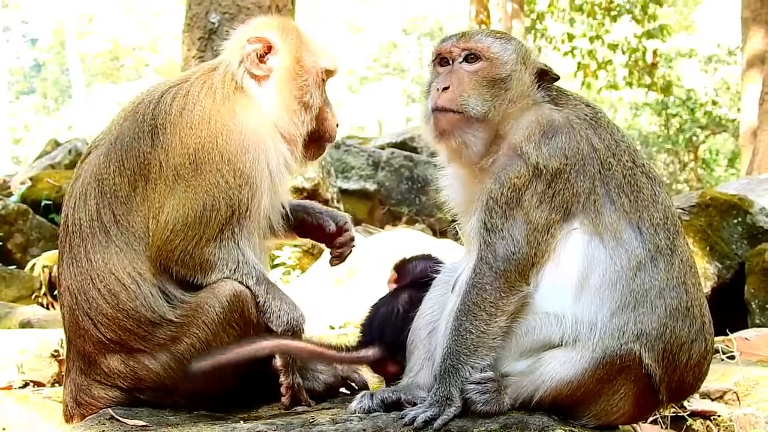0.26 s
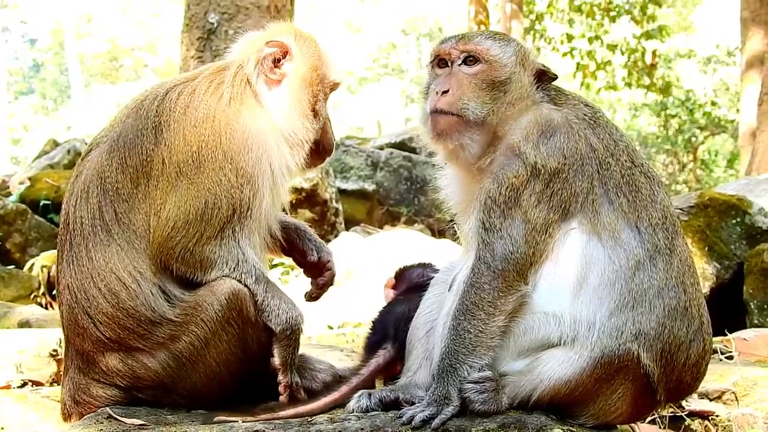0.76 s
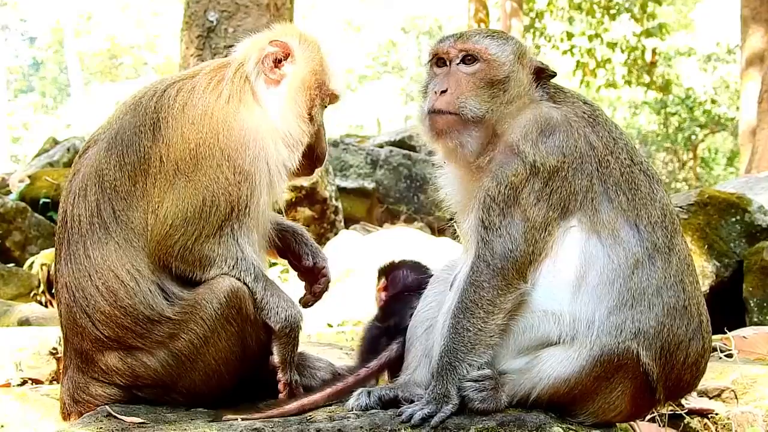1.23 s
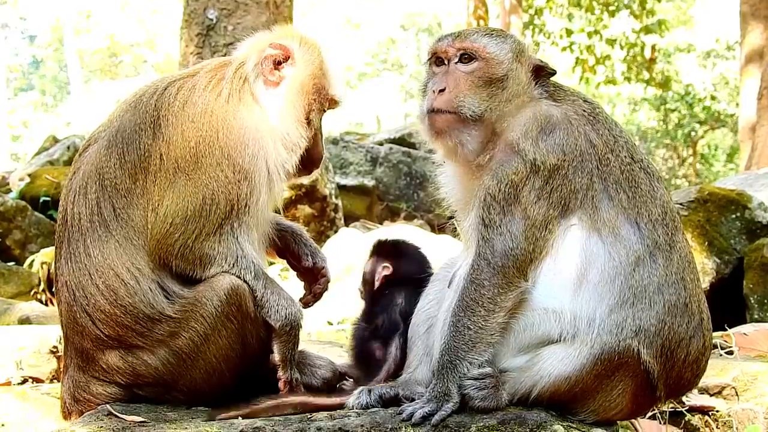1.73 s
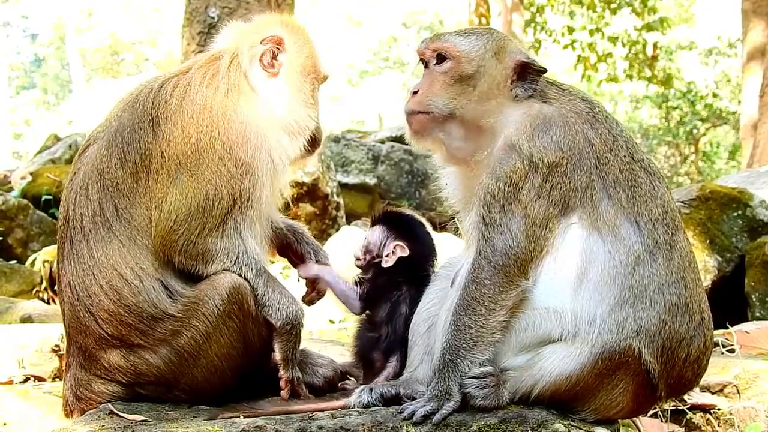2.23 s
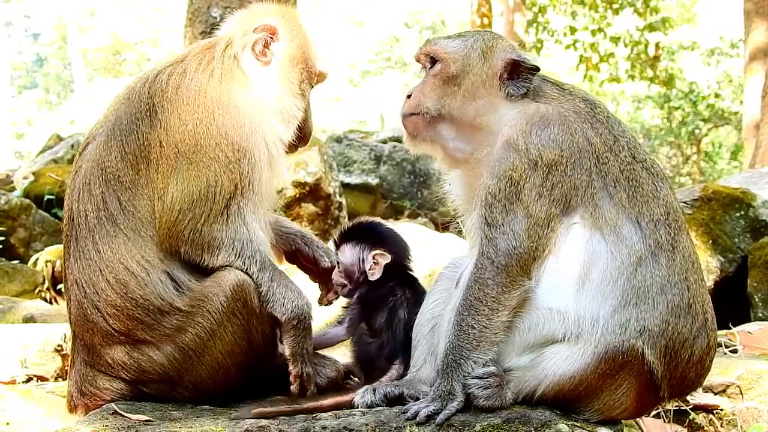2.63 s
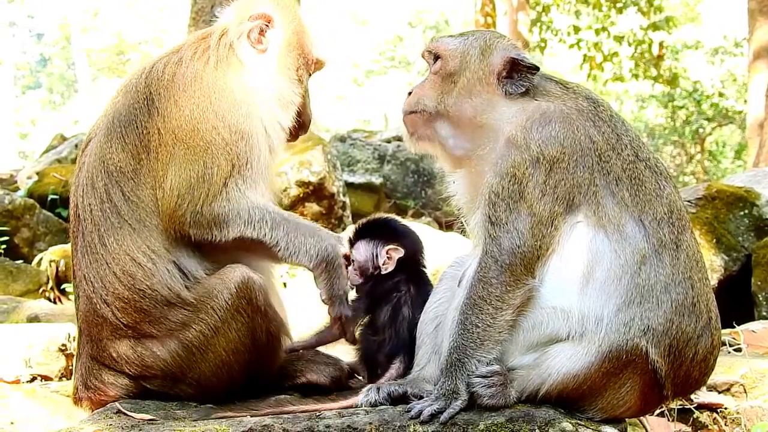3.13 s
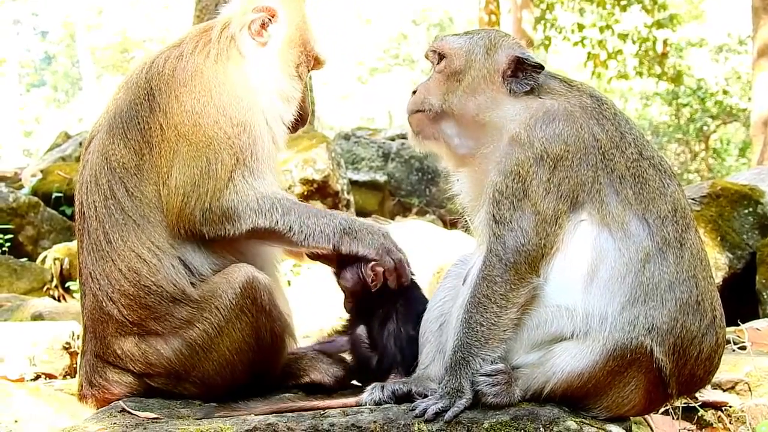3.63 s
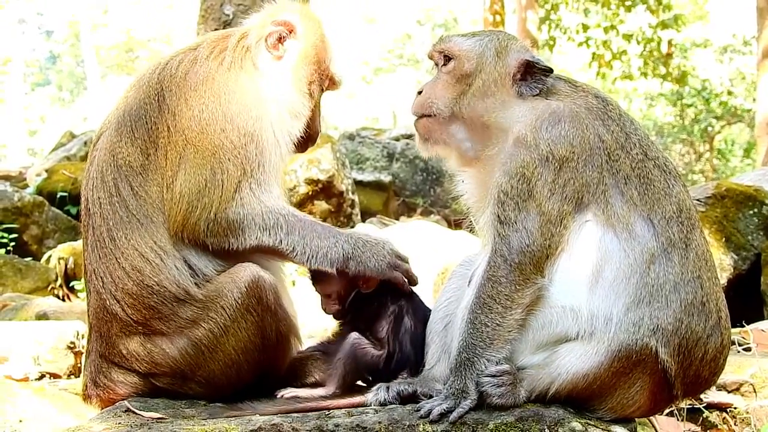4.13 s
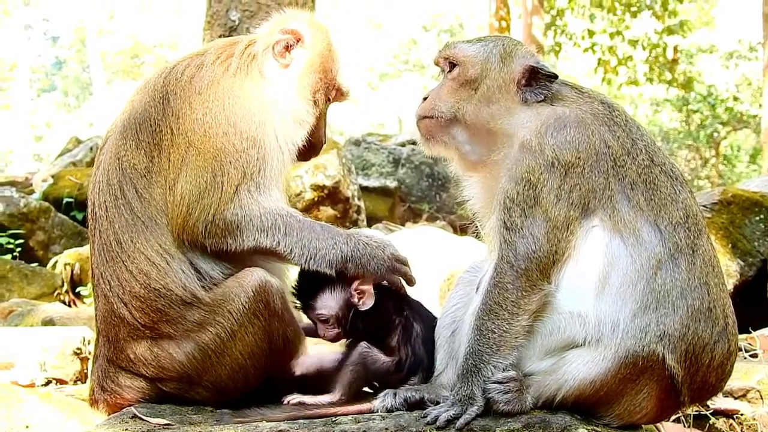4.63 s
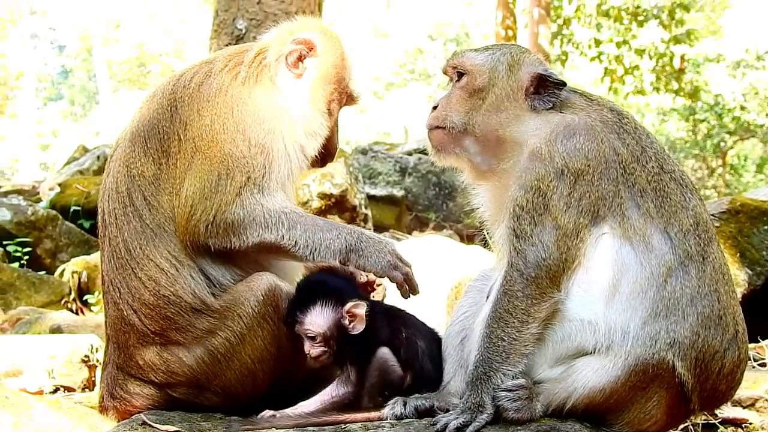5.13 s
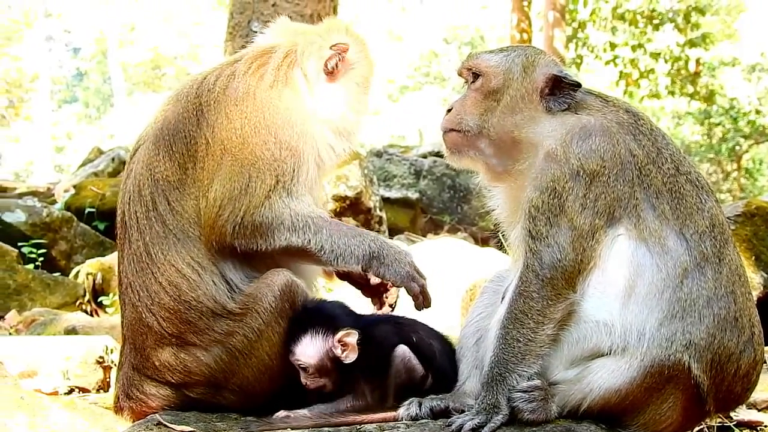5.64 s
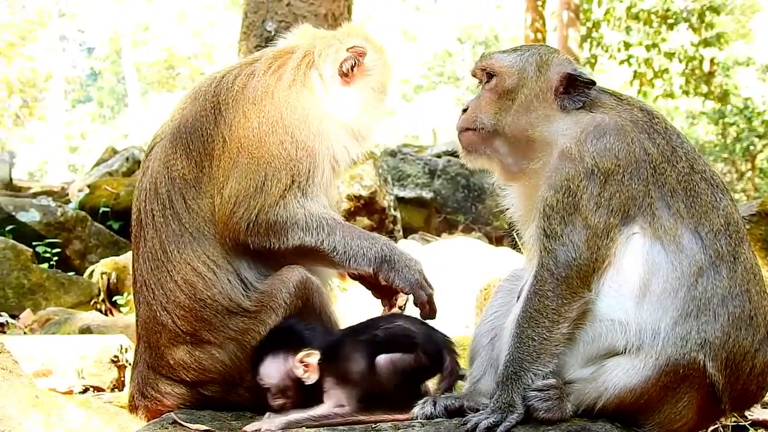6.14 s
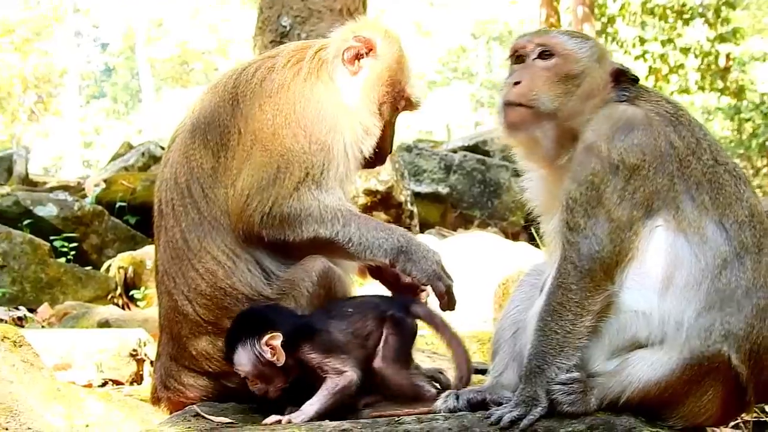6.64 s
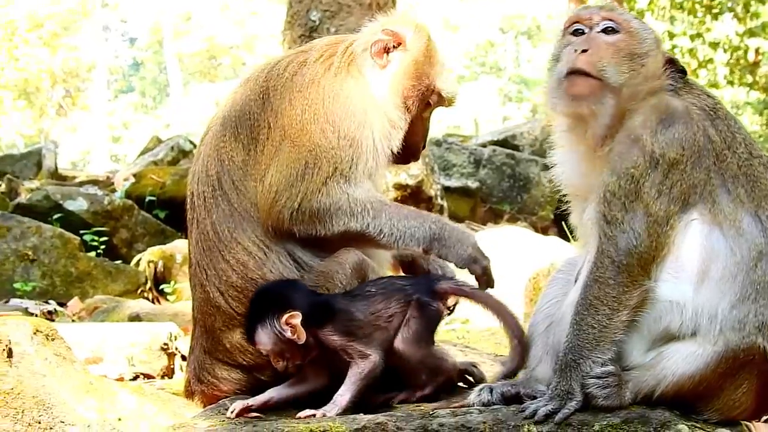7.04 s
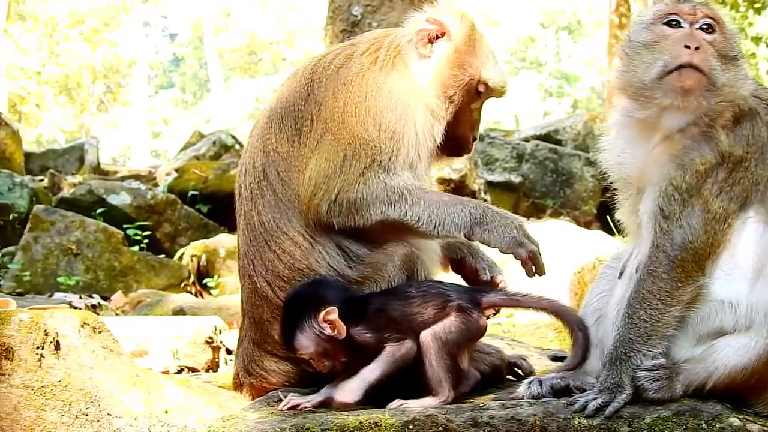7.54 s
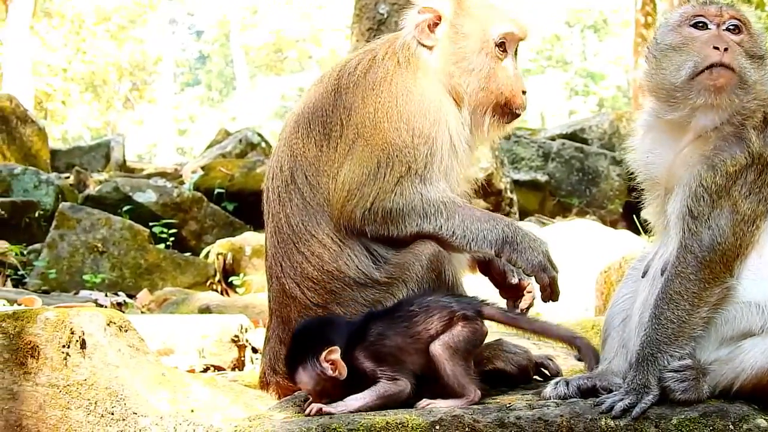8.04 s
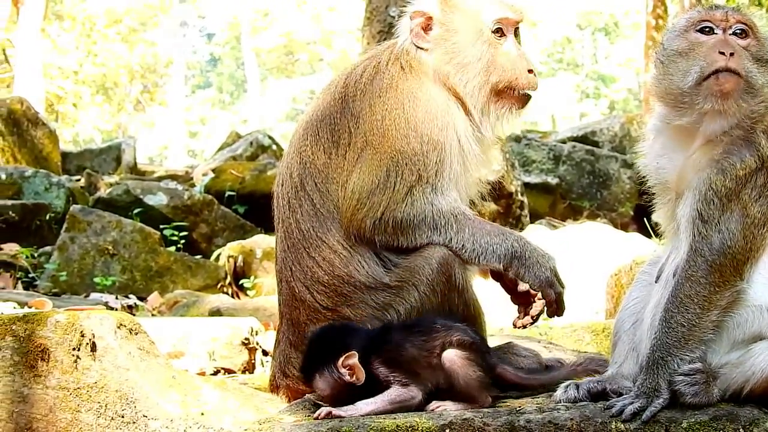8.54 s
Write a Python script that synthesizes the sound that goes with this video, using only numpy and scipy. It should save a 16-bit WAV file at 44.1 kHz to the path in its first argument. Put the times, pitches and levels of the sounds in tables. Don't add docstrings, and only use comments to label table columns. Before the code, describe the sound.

Outdoors among rocks and trees, a fading hoarse monkey cry and two hollow wood knocks open the scene. A bird whistles, then a young monkey squeals loudly close by. Distant cries and rough hoots arrive as echo, and a softer squeal follows. Near six seconds paws scramble in dry leaves, snapping twigs, with another squeal. An adult grunts, a loud far cry sounds, and a last squeal sags. Soft hiss and a far motor hum lie beneath.

```python
import sys
import numpy as np
from scipy import signal
from scipy.fft import rfft, irfft, next_fast_len
from scipy.io import wavfile
from scipy.ndimage import uniform_filter1d

SR = 44100
rng = np.random.default_rng(int(sys.argv[2]) if len(sys.argv) > 2 else 0)


def boost_factor(decibels):
    exponent = np.asarray(decibels, float) / 20
    return 10 ** exponent


def put_to_file(sound):
    columns = np.atleast_2d(sound).T
    safe = np.clip(columns, -1, 1)
    whole_steps = np.round(safe * 32767)
    wavfile.write(sys.argv[1], SR, whole_steps.astype(np.int16))


N = 386842
TIME = np.arange(N) / SR
STEP = 64

# (f/Hz, density/dB)
FOREST = [(15, -43), (25, 1), (123, -2.5), (178, -5), (229, -7), (332, -11.5), (560, -17), (833, -8.5),
          (1710, -14.5), (2040, -14.5), (3440, -15), (3990, -16.5), (6240, -14), (7070, -50), (9530, -59),
          (12400, -78.5), (21000, -120)]
# (f/Hz, likeness)
LIKENESS = [(60, 1.0), (160, 0.96), (450, 0.88), (1220, 1), (3330, 0.32), (9080, 0.12)]
# (f/Hz, width/Hz, level/dB)
MOTOR = [(61.2, 26, -10.5), (113.4, 29.6, -2.5), (167.9, 11.9, -6.5), (224.8, 4.4, -19)]
# (t/s, level/dB)
MOTOR_LEVEL = [(0.0, -45.5), (0.32, -45.5), (0.85, -53), (1.98, -56), (3.81, -55.5), (4.05, -53.5),
               (5.59, -55), (6.01, -49.5), (6.28, -53.5), (6.64, -52), (7.13, -55.5), (7.52, -52),
               (7.84, -56), (8.77, -55)]
# (f/Hz, decay/s, level/dB)
ECHO = [(504, 0.43, 5), (2510, 0.51, 8.5), (3334, 0.83, -1), (3810, 0.51, 10.5), (5580, 0.52, 7),
        (6500, 0.35, 9), (12700, 0.18, 8.5)]
ECHO_T60, ECHO_COLOUR = np.array(ECHO)[:, :2], np.array(ECHO)[:, ::2]
# (t/s, f/Hz, level/dB)
WHISTLE = [
    (0.822, 6520, -54),
    (0.87, 5950, -44),
    (.905, 5190, -56),
    (0.937, 4620, -64.5),
    (.99, 5390, -49),
    (1.015, 6050, -44.5),
    (1.055, 7070, -51),
]

# (t/s, f/Hz, level/dB, roughness 0-1)
HOOTS = [
    [(2.91, 2560, -48, 0.8), (2.96, 2127, -53, 0.97), (3.02, 1420, -46, 0.8), (3.06, 1076, -51, .9),
     (3.12, 1003, -55, 0.95), (3.27, 1125, -56.5, 0.56), (3.4, 1246, -47, 0.6), (3.5, 1316, -51, 0.45),
     (3.54, 1300, -67, .5)],
    [(3.33, 587.4, -59, 0.5), (3.4, 606, -48, 0.54), (3.47, 614, -48, 0), (3.53, 617, -46, 0.3)],
    [(3.52, 622, -45, .3), (3.6, 612, -44, 0.74), (3.64, 574, -44.5, 1.2), (3.69, 601, -46, 1),
     (3.75, 560, -44, 1.1)],
    [(1.0, 565, -59, 0.6), (1.08, 577.5, -51, .4), (1.22, 587, -59, .4), (1.33, 575, -55, 0.7)],
    [(2.64, 558, -44, 0.45), (2.7, 579, -55, .4), (2.78, 567, -61, .6)],
]
HOOT_TILT_DB = [-18.5, 2, 7.5, -3, 4]
# (f/Hz, level/dB)
HOOT_THROAT = [(500, -40), (1250, 5), (1900, -1), (2500, 3.5), (3100, -7), (3750, -19), (4350, -7),
               (5500, -12), (6300, -12.5), (9000, -68)]
# (t/s, length/s, top f/Hz, level/dB, tilt/dB per octave)
ANSWERS = [
    (5.164, 0.22, 847, -65, -6),
]
# (share of length, share of top pitch, level/dB, roughness 0-1)
ARCH = [(0, 0.95, -9.5, 0.7), (0.161, 0.99, 5, 0.38), (0.329, 0.95, 0.5, 0.48), (.62, 1, -2.5, 0.05),
        (.84, 0.93, -3.5, 0.47), (1.001, 0.61, -0.5, 0.9)]
# (t/s, f/Hz, level/dB, roughness 0-1)
CRIES = [
    [(-.02, 931.5, -24.5, 1.2), (.04, 897, -36, 0.84), (.1, 866, -39.5, 0.77), (.17, 915, -49.5, 1.17),
     (.26, 864, -62, .95)],
    [(1.04, 768, -61, 0.5), (1.1, 823, -49.5, 0.42), (1.18, 840, -49.5, 0.39), (1.26, 872, -45.5, 0.9),
     (1.34, 890, -54, 0.7), (1.46, 900, -63, 0.9)],
    [(2.485, 785, -47, .3), (2.53, 881, -33.5, 0.31), (2.56, 916.6, -36.5, .4), (2.65, 920, -38, 0.5),
     (2.695, 887, -38, 0.32), (2.725, 799, -35.5, 0.4), (2.74, 766, -43, 0.6)],
    [(4.56, 840, -57.5, 0.2), (4.62, 896, -47.5, 0.59), (4.66, 957, -48, 0.7), (4.72, 945, -44, 0.63),
     (4.82, 945, -44.5, 0.8), (4.9, 944, -53, .75), (5.0, 922, -52.5, 0.44)],
    [(8.145, 816, -38, 0.75), (8.18, 858, -30.5, 0.54), (8.205, 901, -29, 0.6), (8.228, 941, -21.5, 0.2),
     (8.27, 951, -22.5, 0.4), (8.35, 921, -25.5, 0.2), (8.39, 890, -25, 0.78), (8.42, 872, -29, 1.1)],
]
# (f/Hz, level/dB)
FAR_THROAT = [(470, -65.5), (800, -43), (1810, -21), (2430, -10.5), (2750, -11.5), (3240, -2.5), (3790, 3),
              (4330, -31.5), (5560, -11.5), (6700, -8), (9530, -55), (12400, -81), (21000, -120)]
ROUGH_PER_DB, DROOP_PER_DB = 0.022, 0.13

# (peak t/s, level/dB, rise/s, fall/s, dull over bright/dB); flanks span 20 dB
RUSTLE = [(0.0, -39, .1, 0.19, -9), (.39, -59, 0.53, 0.16, 18.5), (.534, -50, 0.2, 0.32, 1.5),
          (1.004, -60, 0.97, 0.55, 3), (1.45, -62.5, 0.74, 0.79, 6.5), (1.7, -61, 0.41, 0.37, -21),
          (2.664, -51.5, 0.99, 0.61, 0), (3.03, -60.5, 0.22, 0.42, 2), (3.182, -47, 0.21, 0.091, -5),
          (3.66, -63.5, 0.72, 0.66, -20), (4.804, -59.5, 1, 0.28, -26), (5.04, -60, 0.24, 0.09, -25),
          (5.2, -78.5, 0.21, .4, 20), (5.66, -41.5, 0.025, 0.5, -7), (5.782, -39.5, 0.0085, 0.31, -34),
          (5.847, -44, .015, .1, 0), (5.887, -37, .012, .3, -8), (5.96, -42, 0.12, .15, -30),
          (6.008, -37, .03, 0.25, -7), (6.09, -29.5, 0.12, 0.17, -4), (6.155, -44, 0.018, 0.13, -9),
          (6.25, -29, 0.36, 0.34, -9.5), (6.4, -42, .3, 0.14, 3), (6.52, -28, 0.25, 0.073, -15),
          (6.585, -36.5, 0.14, 0.027, -6), (7.093, -62, 1, 0.93, 7), (7.25, -48, 0.1, 0.24, -1.5),
          (7.48, -65, 1, 0.066, 17.5), (7.6, -41.5, 0.042, 0.12, -6), (7.8, -55.5, 0.091, 0.22, 5.5),
          (7.935, -46.5, .06, 0.21, -10), (8.06, -39, .012, .4, -23), (8.14, -42, 0.71, 0.98, -15.5),
          (8.49, -31, 0.33, 0.42, -17), (8.71, -33.5, 0.24, 0.24, -7.5)]
# (f/Hz, density/dB)
LEAVES = [(180, -29), (300, -21), (500, -13.5), (1680, -4.5), (2340, -6), (3300, -5), (4200, -8),
          (5100, -6.5), (6400, 2), (7600, -20.5), (9000, -51.5), (11000, -37), (14500, -53), (16000, -70)]
# (f/Hz, left-right likeness)
LEAF_LIKENESS = [(200, 1), (500, 0.98), (1000, 0.82), (2000, 0.43), (5000, 0.19), (9000, -1.41)]
STILL_DB, STILL_DULL_DB = -68.5, 4.5
MIDDLE_DB, MIDDLE_FOLLOWS = -9.5, 0.24

# (t/s, peak level/dB, ring f/Hz, low level/dB, top level/dB)
SNAPS = [(1.6885, -39.5, 6330, -66, -48), (3.1788, -33.5, 6300, -58, -55), (3.2058, -38, 6400, -52, -54),
         (3.269, -38, 6820, -54.5, -52), (3.339, -43.5, 6950, -56, -69), (3.654, -30, 4730, -69, -59),
         (3.7083, -40, 6800, -60, -39), (5.657, -42, 6480, -54, -58), (5.779, -35, 6300, -53, -64),
         (5.815, -28.5, 6340, -56, -66), (5.847, -42, 5460, -50, -55), (5.866, -33, 6600, -59, -60),
         (5.886, -29.5, 6400, -42.5, -52), (5.96, -41, 6960, -58, -58), (6.007, -30, 6140, -46, -49),
         (6.042, -43, 6420, -54, -55), (6.0517, -23, 5620, -44, -45), (6.0893, -19, 5600, -54, -29),
         (6.1232, -33, 6390, -49, -48), (6.1517, -17, 4830, -39, -38.5), (6.1796, -22, 3100, -41, -46),
         (6.2095, -27, 5400, -48, -48), (6.2589, -20.5, 4300, -41, -50), (6.3605, -26, 5100, -39, -47),
         (6.4701, -20, 3350, -34, -46), (6.5278, -25.5, 7000, -40.5, -46), (6.5758, -31, 6600, -53, -48),
         (6.739, -45, 3580, -46.5, -53), (6.788, -49, 3500, -69, -55), (7.2491, -24, 5960, -54, -39),
         (7.597, -39, 6300, -48, -58), (7.7997, -37, 4230, -62, -57), (7.9312, -28.5, 5740, -58, -50.5),
         (8.0576, -23, 6200, -73, -53), (8.465, -25, 4400, -46.5, -53), (8.676, -28, 4000, -36.5, -49)]
# (t/s, peak level/dB, ring f/Hz)
TICKS = [(5.697, -32.5, 6000), (5.986, -29, 6100), (6.031, -38.5, 6250), (6.189, -31.5, 6200),
         (6.235, -27.5, 6000), (6.549, -35.5, 1500), (6.595, -43, 7850), (6.839, -56, 4300),
         (7.1035, -56.5, 6500), (7.121, -47, 5800), (7.172, -55, 6360), (7.19, -48, 6400),
         (7.2256, -40, 6240), (7.777, -55, 7900), (7.829, -40, 4340), (7.937, -34, 6300),
         (8.081, -46, 6500), (8.1424, -51.5, 6400)]
# (t/s, low level/dB)
PATS = [(0.3038, -41), (.371, -52), (0.4094, -40), (0.7865, -53.5), (1.001, -56.5), (1.0126, -52.5),
        (1.099, -50), (1.2194, -51.5), (1.401, -55), (1.499, -59), (2.439, -56), (2.569, -42),
        (3.0265, -56), (3.119, -46.5), (2.163, -48), (7.12, -68), (7.1906, -52)]
# (t/s, peak level/dB, ring f/Hz)
KNOCKS = [
    (0.304, -20, 488),
    (0.412, -23, 460),
    (2.439, -39, 476),
    (6.051, -28, 483),
    (6.405, -28.5, 560),
]

# (t/s, f/Hz, level/dB)
COO = [
    (5.99, 509.2, -64),
    (6.064, 516, -39.5),
    (6.118, 460, -54),
    (6.13, 507.5, -71),
]
# (t/s, level/dB, pulse f/Hz)
GRUNT = [
    (7.44, -70, 96),
    (7.456, -43, 95),
    (7.502, -35.5, 73),
    (7.566, -36, 130),
    (7.764, -55, 120),
    (7.78, -63, 54),
]
# (f/Hz, width/Hz, level/dB)
GRUNT_MOUTH = [(1370, 410, 11), (1730, 52, 3), (2730, 370, 1.5)]

# (t/s, hold until the break/s, top f/Hz, sag/Hz per s, level/dB)
SQUEALS = [
    (1.856, 0.176, 840.2, 89.5, -16),
    (3.881, 0.172, 847.7, -10.5, -24.5),
    (6.258, .16, 846.5, 14.5, -20),
    (8.49, 0.14, 869.4, 369.5, -18.5),
]
# (rise/s, scoop/Hz, onset level/dB, end of hold level/dB)
ATTACKS = [(.075, 270, -37, -2.5), (0.046, 30, -21.5, -3.5), (0.0461, 37.5, -13, -2), (.04, 200, -15.5, -1)]
# (f/Hz, level/dB)
THROAT = [(840, -44), (1680, -22), (2520, -7), (3380, -2), (4200, -27), (5050, -6.5), (5900, -13.5),
          (6750, -15.5), (7600, -21), (8450, -19), (9300, -37.5), (10100, -53), (11800, -44),
          (12800, -53.5), (15600, -68.5)]
BREAK_S, DROP_HZ_PER_S2, SWELL_DB, FADE_DB = 0.1075, 22000, -21.5, -23
CLEAR, HOARSE, HOLD_TILT_DB, BREAK_TILT_DB = 0.094, 1, -0.5, 6.5

MOUTH_HZ = [1200, 1800, 2600, 3500, 4300, 5500, 6700, 8500]
SQUEAL_MOUTHS = [(-8, -6, -7, 2.7, -7.5, -0.43, -3, -2.2), (-6, -0.2, -3.5, 2, 5.5, 0.58, 2.5, 1),
                 (-13, -1.5, -0.5, 0.37, 5, 0.87, 4.5, 0.38), (-4, 3, -5.5, 0.76, 7, 0.31, 4.5, -1.1)]
ANSWER_MOUTHS = [(.1, .1, .1, .1, 0.11, .1, .1, .1)]
CRY_MOUTHS = [(2, 1, 4.5, .1, -11, 2, -8, .1), (2, 3.5, -0.5, .1, -23, -6, -10, -9),
              (.1, 12, -0.5, .1, 2, -1, 0, 8), (5, 1, 0.5, .1, -1, 7.5, -1, -2),
              (-5, .1, -3.5, .1, 12, 5, 1, 17)]
HOOT_MOUTHS = [(-3, -1, -3, -5, 25, -5.5, -1, 4), (-9, -2, -1, -3, -4.5, -7, 5, -5),
               (-18, 7.5, -1, 14, -6, 7, -4, .1), (-1, 3, -1.5, -9.5, -12, -7, -9, -9),
               (-5, -10, -17, -17, -18, -15, -15, -17)]


def rms_one(x):
    return x / np.sqrt(np.mean(x ** 2) + 1e-20)


def in_time(rows):
    s, *columns = np.transpose(rows)
    return [np.interp(TIME, s, c) for c in columns]


def at_hz(points, hz):
    f, value = np.array(points).T
    return np.interp(np.log(hz), np.log(f), value)


def gate(rows, fade=0.009):
    return np.clip(np.minimum(TIME - rows[0][0], rows[-1][0] - TIME) / fade, 0, 1)


def drift(rate, size=N):
    r = np.exp(-2 * np.pi * rate / SR)
    settle = 9000
    white = rng.standard_normal(size + settle)
    return rms_one(signal.lfilter([1], [1, -2 * r, r * r], white)[settle:])


def resonance(x, hz, width):
    r = np.exp(-np.pi * width / SR)
    poles = [1, -2 * r * np.cos(2 * np.pi * hz / SR), r * r]
    return signal.lfilter([(1 - r * r) / 2, 0, (r * r - 1) / 2], poles, x + 1e-18)


def resonate_twice(x, hz, width):
    return resonance(resonance(x, hz, width), hz, width)


def pan(x, db):
    return x * boost_factor(np.array([[db / 2], [-db / 2]]))


def bands(white, spectrum, likeness, gain_db, patchy_db):
    out, edges = 0, 28 * 2 ** np.arange(0, 9.2, 1 / 3)
    for k, (low, high) in enumerate(zip(edges, edges[1:])):
        band = signal.butter(2, [low, high], "band", fs=SR, output="sos")
        mid, side = signal.sosfilt(band, white[k % 2])
        hz = np.sqrt(low * high)
        alike = np.clip(at_hz(likeness, hz), -1, 1)
        flicker_db = patchy_db * drift(1300, size=len(TIME[::STEP]))
        gain = np.repeat(boost_factor(at_hz(spectrum, hz) + gain_db(hz) + flicker_db), STEP)[:N]
        out = out + gain * (np.sqrt(1 + alike) * mid + np.sqrt(1 - alike) * side * [[1], [-1]])
    return out


def tone(rows, rough):
    pitch, level_db = in_time(rows)
    wave = np.sin(2 * np.pi * np.cumsum(pitch) / SR)
    return np.sqrt(2) * boost_factor(level_db) * gate(rows) * (1 + rough * drift(95)) * wave


def voice(calls, throat, mouths, jitter, wobble_db):
    out = np.zeros(N)
    for rows, mouth_db in zip(calls, mouths):
        mouth = list(zip(MOUTH_HZ, mouth_db))
        on = gate(rows) > 0
        pitch, level_db, rough, tilt_db = (c[on] for c in in_time(rows))
        size, rough = len(pitch), np.clip(rough, 0, 1)
        pitch = uniform_filter1d(pitch, size=900, mode="nearest")
        phase = 2 * np.pi * np.cumsum(pitch * (1 + jitter * rough * drift(103, size=size))) / SR
        call, power = 0, 0
        for k in range(1, 19):
            hz = k * pitch
            colour_db = at_hz(throat, hz) + at_hz(mouth, hz) + tilt_db * np.log2(hz / 3500)
            weight = boost_factor(colour_db + wobble_db * drift(24, size=size)) * (hz < throat[-1][0])
            breath = 1 + rough * drift(200, size=size) + rough ** 2 * drift(680, size=size)
            call = call + weight * breath * np.sin(k * phase + k * k)
            power = power + weight ** 2 * (1 + 3 * rough ** 2) / 2
        level = boost_factor(level_db + 0.8 * drift(24, size=size))
        out[on] += level * gate(rows)[on] * call / np.sqrt(power)
    return out


def forest_hiss():
    white = rng.standard_normal((2, 2, N))
    return boost_factor(-61) * rms_one(bands(white, FOREST, LIKENESS, lambda hz: 0, patchy_db=-0.5))


def motor():
    white = rng.standard_normal(N)
    hum = sum(boost_factor(db) * rms_one(resonate_twice(white, hz, width)) for hz, width, db in MOTOR)
    return boost_factor(in_time(MOTOR_LEVEL)[0]) * rms_one(hum)


def echoes(x):
    size = next_fast_len(N + SR)
    t, tail = np.arange(SR) / SR, 0
    white = rng.standard_normal((2, SR))
    white[1] = 0.79 * white[0] + 0.57 * white[1]
    for low in 200 * 2 ** np.arange(0, 6.3, 1 / 3):
        sos = signal.butter(2, [low, 1.26 * low], "band", fs=SR, output="sos")
        hz = 1.12 * low
        decay_db = at_hz(ECHO_COLOUR, hz) - 60 * t / at_hz(ECHO_T60, hz)
        tail = tail + signal.sosfilt(sos, white) * boost_factor(decay_db)
    tail = tail * np.clip((t - 0.006) / 0.0062, 0, 1)
    tail = tail / np.sqrt(np.sum(tail ** 2, axis=1, keepdims=True))
    return irfft(rfft(x, size) * rfft(tail, size), size)[:, :N]


def cliff(x):
    size = next_fast_len(N + SR // 2)
    dulled = signal.sosfilt(signal.butter(2, 6500, fs=SR, output="sos"), x)
    spectrum = rfft(dulled, size)
    lags = [np.clip(0.13 + 0.045 * drift(30, size=len(spectrum)), 0.04, 0.22) for side in range(2)]
    turn = np.exp(-2j * np.pi * np.cumsum(lags, axis=1) * SR / size)
    return boost_factor(-11.5) * irfft(spectrum * turn, size)[:, :N]


def bird():
    again = [(s + 3.98, hz, db - 14.5) for s, hz, db in WHISTLE]
    return tone(WHISTLE, rough=0.75) + tone(again, rough=1.5)


def hoots():
    calls = [[(*row, tilt_db) for row in rows] for rows, tilt_db in zip(HOOTS, HOOT_TILT_DB)]
    return voice(calls, HOOT_THROAT, HOOT_MOUTHS, jitter=0.021, wobble_db=2.5)


def answer(start, length, hz, level_db, tilt_db):
    droop = 1 - DROOP_PER_DB * np.clip(tilt_db, -6, 6)
    rows = []
    for share, bend, db, rough in ARCH:
        fall = (1 - bend) * (droop if share > 0.7 else 1)
        roughness = rough + ROUGH_PER_DB * tilt_db
        rows.append((start + share * length, hz * (1 - fall), level_db + db, roughness, tilt_db))
    return rows


def far_calls():
    calls = [answer(*row) for row in ANSWERS] + [[(*row, 0) for row in rows] for rows in CRIES]
    return voice(calls, FAR_THROAT, ANSWER_MOUTHS + CRY_MOUTHS, jitter=0.025, wobble_db=3.5)


def bouts():
    s, level_db, rise, fall, dull_db = np.transpose(RUSTLE)[:, :, None]
    since = TIME[::STEP] - s
    bout_db = level_db - 20 * np.where(since < 0, -since / rise, since / fall)

    def total(db, still_db):
        return 10 * np.log10(np.sum(boost_factor(db) ** 2, axis=0) + boost_factor(still_db) ** 2)

    dull = total(bout_db + dull_db, STILL_DB + STILL_DULL_DB)
    middle = total(bout_db + MIDDLE_DB + MIDDLE_FOLLOWS * dull_db, STILL_DB + MIDDLE_DB)
    return dull, middle, total(bout_db, STILL_DB)


def rustle():
    dull_db, middle_db, bright_db = bouts()
    close = np.repeat(np.clip((bright_db + 50) / 12, 0, 1), STEP)[:N]
    strength = boost_factor(4 * np.minimum(rng.exponential(1, N), 2.5))
    grains = (rng.random((2, 1, N)) < 110 / SR) * strength
    grains = signal.lfilter([1], [1, -0.98], grains)
    white = rng.standard_normal((2, 2, N)) * (1 - 0.3 * close + 0.9 * close * grains)

    def gain_db(hz):
        place = np.interp(np.log(hz), np.log([1100, 2800, 6000]), [0, 1, 2])
        dull, middle, bright = [max(0, 1 - abs(place - k)) for k in (0, 0.98, 2)]
        return dull * (dull_db + 14.5) + middle * (middle_db + 15.5) + bright * (bright_db + 9.5)

    return pan(bands(white, LEAVES, LEAF_LIKENESS, gain_db, patchy_db=2.5), 1.4)


def snaps():
    length = 1500
    out, t = np.zeros((2, N + length)), np.arange(length) / SR
    hits = SNAPS + [(s, db, hz, db - 26, db - 13) for s, db, hz in TICKS]
    hits = hits + [(s, db - 30, 2600, db, db - 55) for s, db in PATS]
    for s, peak_db, hz, low_db, top_db in hits:
        burst = rng.standard_normal((2, length))
        ring = resonate_twice(burst * np.exp(-t / 0.0035), hz, 0.35 * hz)
        dull = resonate_twice(burst[0] * np.exp(-t / 0.004), 950, 2200)
        dull = signal.sosfilt(signal.butter(4, 2700, fs=SR, output="sos"), dull)
        tick = resonate_twice(burst * np.exp(-t / 0.0025), 10500, 4500)
        parts = [(ring, peak_db + 8), (dull, low_db + 12), (tick, top_db + 2)]
        at = round(s * SR)
        out[:, at:at + length] += sum(boost_factor(db) * p / np.abs(p).max() for p, db in parts)
    return out[:, :N]


def knocks():
    length = 1500
    out, t = np.zeros(N + length), np.arange(length) / SR
    for s, peak_db, hz in KNOCKS:
        body = np.sin(2 * np.pi * hz * t) * np.exp(-t / 0.0037)
        body = body + 1.56 * np.sin(4.6 * np.pi * hz * t) * np.exp(-t / 0.0012)
        soft_edge = (1 - np.exp(-t / 0.0008)) ** 2
        at = round(s * SR)
        out[at:at + length] += boost_factor(peak_db) * body * soft_edge
    return out[:N]


def grunt():
    level_db, per_s = in_time(GRUNT)
    cycles = np.cumsum(per_s * (1 + 0.18 * drift(40))) / SR
    pulses = np.diff(np.floor(cycles), prepend=0) * boost_factor(1.6 * rng.standard_normal(N))
    source = pulses + 0.16 * rng.standard_normal(N)
    mouth = sum(boost_factor(db) * resonate_twice(source, hz, width) for hz, width, db in GRUNT_MOUTH)
    return boost_factor(level_db) * gate(GRUNT) * rms_one(mouth)


def squeal(start, held, hz, sag, level_db, rise, scoop, onset_db, tired_db):
    late, end = hz - sag * (held - rise), start + held
    peak = hz - 0.5 * sag * rise
    rows = [
        (start, hz - scoop, level_db + onset_db + 1.5, 0.6, -5),
        (start + 0.55 * rise, hz - 0.48 * scoop, level_db + onset_db / 4, 0.5, -1.5),
        (start + rise, hz - 0.061 * scoop, level_db - 0.4, 2 * CLEAR, HOLD_TILT_DB),
        (start + 1.414 * rise, peak, level_db + 0.5, CLEAR / 2, HOLD_TILT_DB),
        (end, late, level_db + tired_db, CLEAR, HOLD_TILT_DB)]
    for share, db in [(0.3, SWELL_DB), (0.6, FADE_DB), (1, FADE_DB - 12.5)]:
        fallen = DROP_HZ_PER_S2 * (share * BREAK_S) ** 2 * (1 - 0.275 * share)
        tilt_db = BREAK_TILT_DB * (1 - 3.1 * share ** 2)
        rows.append((end + share * BREAK_S, late - fallen, db, HOARSE * share ** 1.38, tilt_db))
    return rows


def squeals():
    calls = [squeal(*row, *attack) for row, attack in zip(SQUEALS, ATTACKS)]
    return voice(calls, THROAT, SQUEAL_MOUTHS, jitter=0.021, wobble_db=3.36)


def scene():
    background = forest_hiss() + motor()
    whistle, deep, far = bird(), hoots(), far_calls()
    leaves, twigs = rustle(), snaps() + knocks()
    adult = grunt() + tone(COO, rough=0.087)
    near = squeals()
    direct = pan(near, 0.91) + pan(boost_factor(-2) * far + whistle, 0.55) + pan(boost_factor(-2.5) * deep, 3.1)
    direct = direct + pan(adult, -7) + twigs
    sent = boost_factor(-6) * near + boost_factor(-4.5) * (far + deep) + boost_factor(-0.5) * whistle + adult
    sent = sent + boost_factor(-7) * twigs.mean(axis=0)
    return direct + cliff(near) + echoes(sent) + leaves + background


def roll_off(x):
    return signal.sosfilt(signal.butter(12, 15700, fs=SR, output="sos"), x)


def record(dry):
    dry = signal.sosfilt(signal.butter(4, 38, "high", fs=SR, output="sos"), dry)
    dry = signal.sosfilt(signal.butter(4, 13500, fs=SR, output="sos"), dry)
    return roll_off(dry)


dry = scene()
out = record(dry)
put_to_file(out)
```